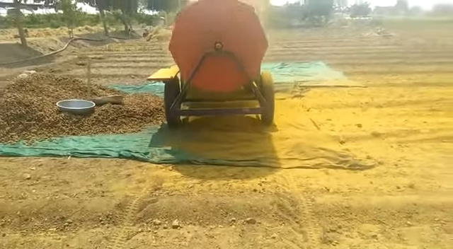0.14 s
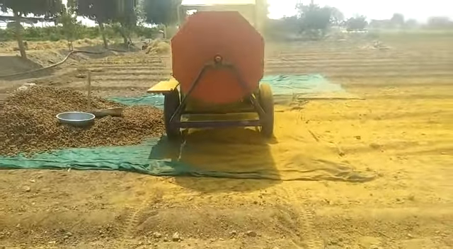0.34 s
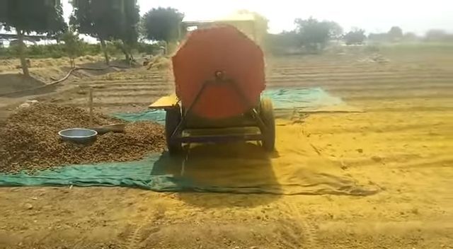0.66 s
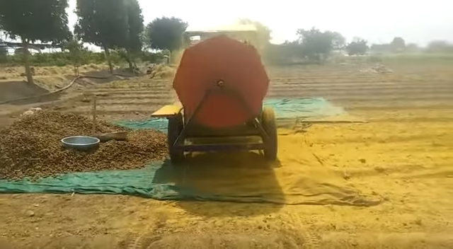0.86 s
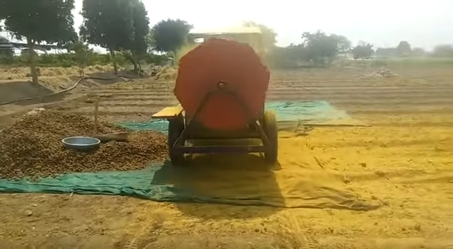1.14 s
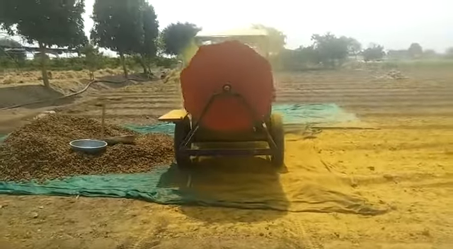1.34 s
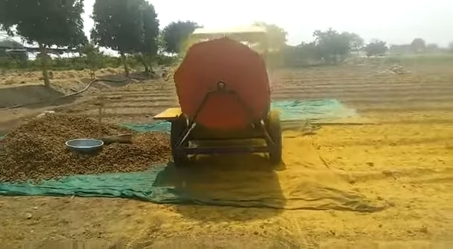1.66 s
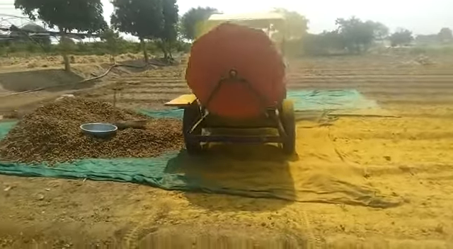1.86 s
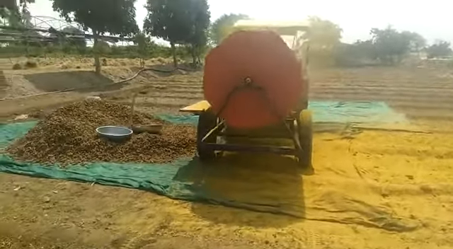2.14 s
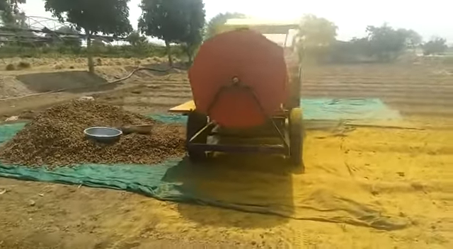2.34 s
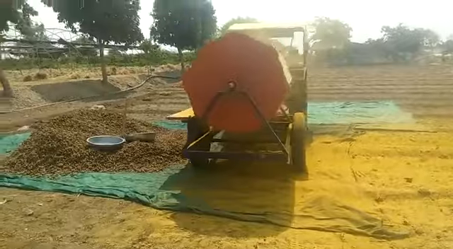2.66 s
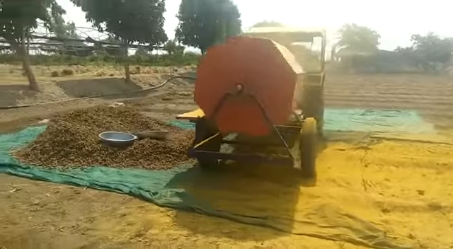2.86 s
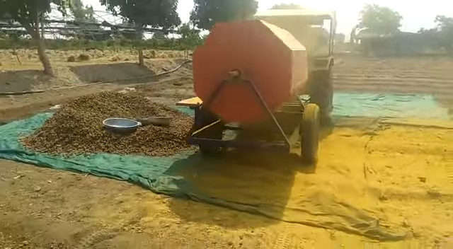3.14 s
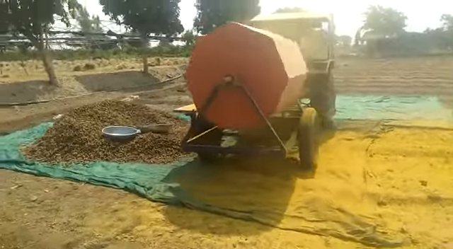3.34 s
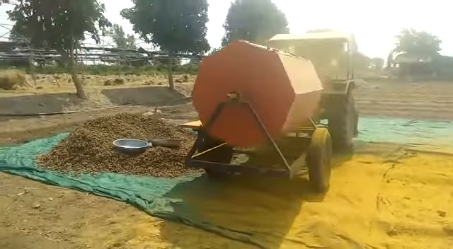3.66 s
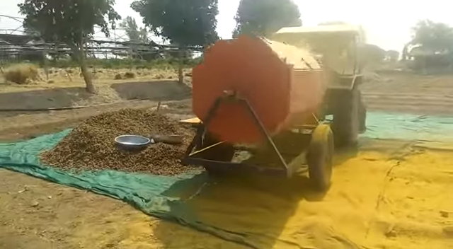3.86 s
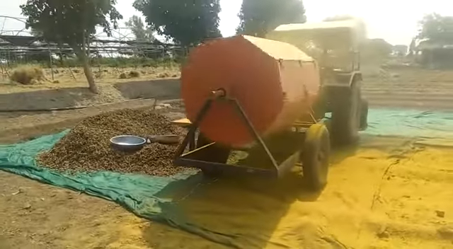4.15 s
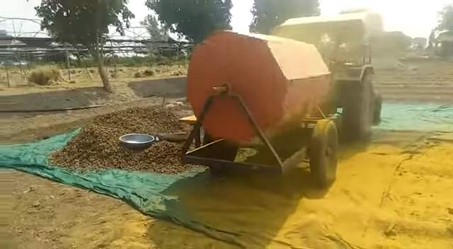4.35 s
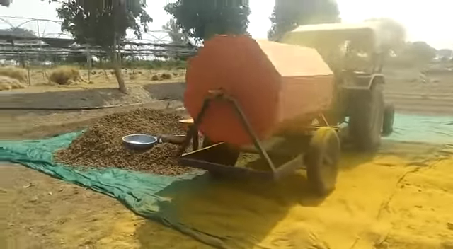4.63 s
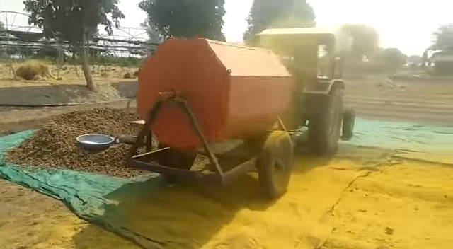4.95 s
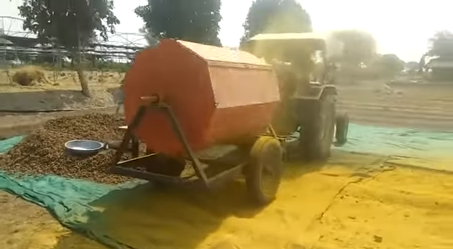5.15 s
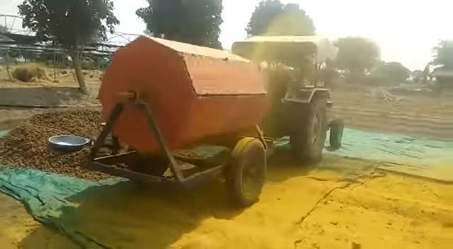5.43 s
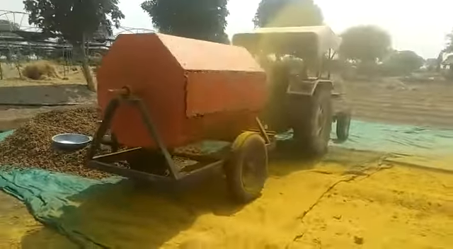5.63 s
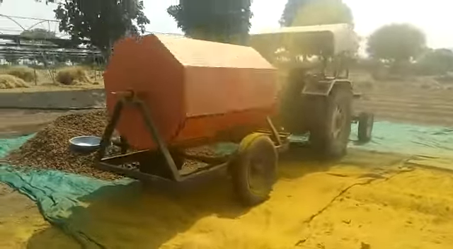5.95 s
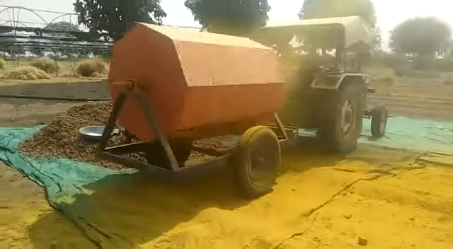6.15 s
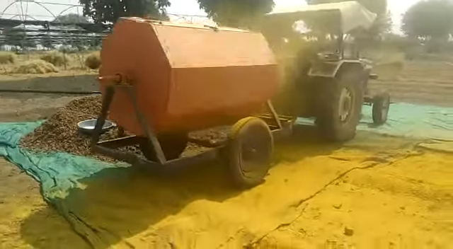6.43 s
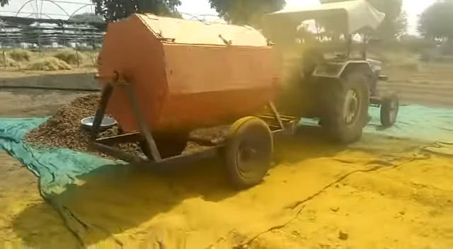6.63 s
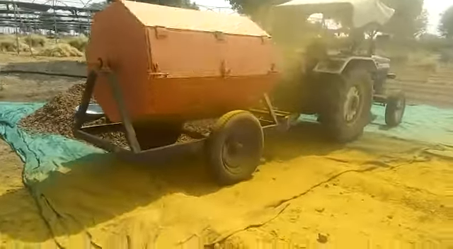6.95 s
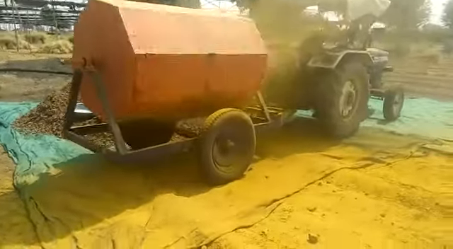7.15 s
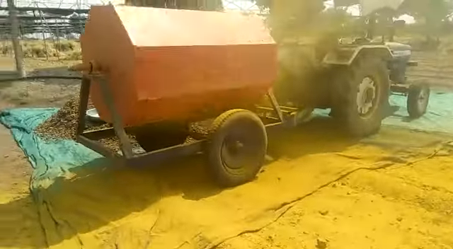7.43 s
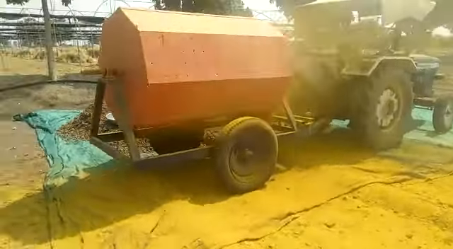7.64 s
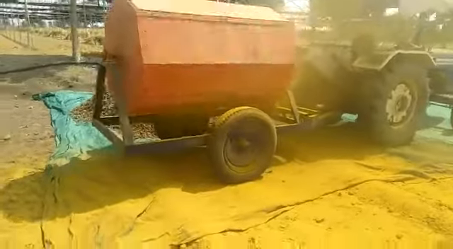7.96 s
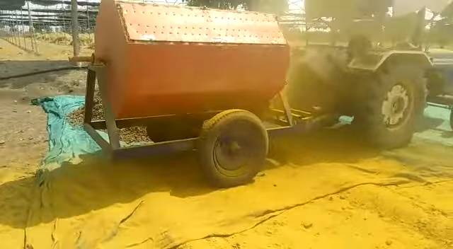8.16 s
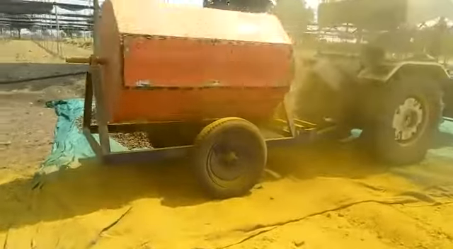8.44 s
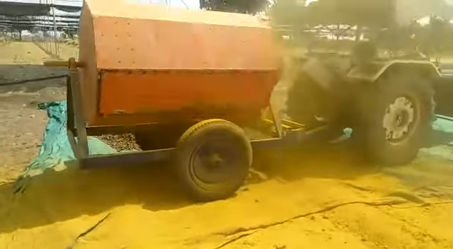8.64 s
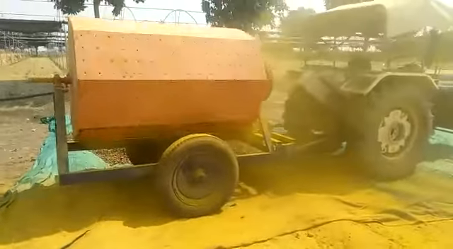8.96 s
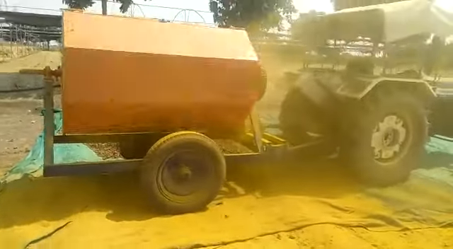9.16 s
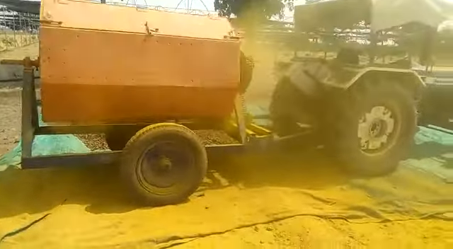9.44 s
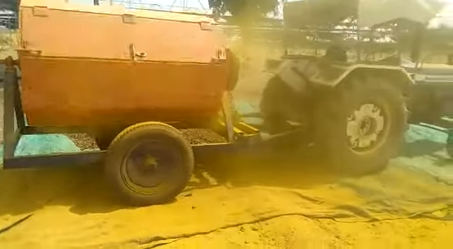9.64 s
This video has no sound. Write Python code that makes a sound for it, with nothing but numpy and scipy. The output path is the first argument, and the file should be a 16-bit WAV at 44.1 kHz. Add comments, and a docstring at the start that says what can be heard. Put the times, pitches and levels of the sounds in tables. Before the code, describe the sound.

Dried roots rattle and crash in rhythmic surges inside a turning steel drum, over a low tractor diesel hum and soft hollow booms.

```python
"""Dried roots rattle, slide and crash in surges inside an eight-sided steel polishing drum in a field.
A tractor turns it once in 1.4 s: its three-cylinder diesel hums underneath, and the drum booms softly.
Once a turn the hatch latch clinks. Noise clumps and ringing modes are coloured by the drum's response.
A hand is cupped near the microphone at first; then the listener walks from the drum's closed end
to its side, where the perforated plates sweep the hiss downwards as they pass."""
import sys
import numpy as np
from scipy import signal
from scipy.fft import rfft, irfft, next_fast_len
from scipy.io import wavfile
from scipy.ndimage import map_coordinates

SR = 44100
rng = np.random.default_rng(int(sys.argv[2]) if len(sys.argv) > 2 else 0)


def digitize_waveform(pressure):
    """Quantize a signal to 16-bit integers and store it at the path in sys.argv[1].

    Rows of a 2-D input are taken as channels; values are limited to [-1, 1].
    """
    field = np.atleast_2d(pressure).T
    bounded = np.clip(field, -1, 1)
    quanta = np.round(bounded * 32767).astype(np.int16)
    wavfile.write(sys.argv[1], SR, quanta)


N = 431738
TURN_S = 1.416  # one turn of the drum
# After the big crash the heaped load covers the holes: time within the turn and half-width.
COVER_AT_S, COVER_WIDTH_S = 0.59, 0.11

# The drum's colour heard from its corner. Each row: frequency in Hz, relative level in dB.
CORNER_VIEW = [(150, -38), (250, -13), (316, -13), (368, -29), (421, -8.5), (516, -14.5), (580, -7.5),
               (735, -3.5), (978, -9.5), (1300, -5.5), (3130, -9), (4930, -0.5), (7140, -5.5),
               (10500, -24.5), (14000, -33.5)]
# Perforated plates turning past. Each row: time in seconds, relative strength of the sweep in dB.
PLATES_PASSING = [(6.35, 4.5), (6.72, 2.5), (7.11, 6), (7.47, 3.5), (7.87, 5), (8.23, 5.5), (8.60, 7),
                  (8.93, 3.5), (9.32, 6), (9.68, 7)]
# A hard clump hangs for an instant, then strikes the steel.
# Each row: time in seconds, relative level in dB, t60 in seconds, hush before it in dB (below 0: a swell).
HARD_STRIKES = [(1.938, 0.5, 0.18, 1), (3.3263, -2, .12, 3), (3.5598, -6, 0.071, -0.5),
                (4.569, -11.5, 0.074, -1.5), (4.9092, 2, 0.22, 5.5), (5.4455, 4.5, .12, 1),
                (5.6441, -0.5, .1, 5), (6.1794, -3, 0.11, 1.5), (7.071, -5, 0.081, 0), (7.4739, -7, .1, 3),
                (7.871, 0, 0.081, 1)]


def roots(knock_db=-12, low_lag=0.41, low_db=-3.0):
    """Clumps of roots fall from plate to plate: knocks on the shell, bright clicks and a fizz of grit."""
    # Stereo width. Each row: frequency in Hz, side to mid in dB.
    stereo_width = [(3600, -80), (4000, -54), (4400, -78), (5200, -21), (6300, -9.5), (8000, -6.5),
                    (13000, -4.5)]
    frame = 1024  # samples
    sample_t = np.arange(N) / SR
    steps = np.arange(0, N / SR, .005)
    flow_db = np.interp(sample_t, steps, levels(steps)[1])
    clumps = unit(amp(1.0 * wobble(32) + 0.89 * wobble(140)))
    mid = clumps * cascade(flow_db)
    side = clumps * cascade(flow_db)
    # in the middle register the ring of the plates takes over from the dry clicks
    dry_click_db = [(450, 0), (700, -2.5), (2200, -1), (3600, 0)]
    mid = filtered(mid, lambda f: amp(along(dry_click_db, f)))
    mid = mid + amp(knock_db) * rings(rate=340, centre_hz=1750.0, spread=.45, t60=0.089, size_db=1.5)
    hush = amp(-hush_db(sample_t))
    hz, t, z = signal.stft(hush * [mid, side], SR, nperseg=frame)
    hz = hz[:, None]

    # each clump lands on another spot, and the echoes inside shift as the drum turns
    shifting_db = 2 * patches(hz, t, width_hz=330, rate=20) + 1.4 * patches(hz, t, width_hz=150, rate=3)
    shift_share = along([(600, 0.89), (1200, 0.55), (2500, 0.92), (5000, 1.0), (12000, 1.0)], hz)
    colour = amp(drum_colour(hz, t) + shifting_db * shift_share)

    # knock, click and grit each fill their own register and merge at the edges
    registers_hz = [(500, 3200), (3800, 7600), (8500, 14000)]
    upper = along([(2800, 0.0038), (4200, 0.98)], hz)
    top = along([(7000, 0), (9200, 0.88)], hz)
    shares = [1 - upper, upper - top, top]
    register_levels = levels(t)
    gain_db = 0
    for level_db, (low, high), share in zip(register_levels, registers_hz, shares):
        power = np.mean(colour ** 2 * (hz > low) * (hz < high), axis=0)
        gain_db = gain_db + share * (level_db - 10 * np.log10(power))
    # the lowest knocks come from the rolling bulk, which surges less than the falling roots
    bulk_share = along([(450, 0.56), (900, 0)], hz)
    gain_db = gain_db + bulk_share * (low_db - low_lag * (register_levels[0] + 28.0))

    mid_side_gain = np.array([np.ones_like(hz), amp(along(stereo_width, hz))])
    z = z * colour * amp(gain_db) * mid_side_gain
    mid, side = signal.istft(z, SR, nperseg=frame)[1][:, :N]
    return np.array([mid + side, mid - side])


def levels(t):
    """Knock, click and grit in dB: the surges of each turn over steady sliding, as they reach the walker."""
    # The load gives way five times a turn, always in this order: a pour that thins out into the lull,
    # a sudden spill that trickles on, the big crash, a long slide, a second crash.
    # Each row: rise in seconds, swell over the hold in dB, decay in seconds, then relative levels in dB
    # of the knock on the shell, the click of root on root and the grit.
    falls = [(.117, -5, .051, -24, -21, -39.5), (.008, -8, 1.6, -37.5, -30, -53),
             (.032, 0.75, .049, -21.5, -17.5, -37), (.086, 0, .057, -27.5, -23.5, -42.5),
             (.071, 0.58, .042, -23.5, -20.5, -40)]
    # Surges of the load, running through the five falls. Each row: start of the hold in seconds,
    # hold in seconds, strength in dB, extra click and grit in dB.
    surges = [(0.082, 0.099, -2.5, -2.5), (0.384, 0.025, -2.0, 1.0), (0.513, 0.019, -2.5, -1.0),
              (0.718, 0.25, -3.0, -0.5), (1.198, 0.052, -1.0, -1.0), (1.46, 0.126, -1.5, 0.0),
              (1.82, 0.076, 4.5, 0.0), (1.934, 0.012, 2.5, -0.5), (2.154, 0.22, -1.0, 0.5),
              (2.624, 0.037, 1.5, 0.0), (2.897, 0.13, 1.0, 1.0), (3.208, 0.04, 3.5, 0.5),
              (3.343, 0.027, 1.5, -0.5), (3.554, 0.25, 1.0, 0.0), (4.04, 0.03, 1.0, 0.5),
              (4.282, 0.14, 0.5, 1.5), (4.64, 0.034, -2.5, -1.5), (4.753, 0.049, 0.0, -1.0),
              (4.991, 0.23, 1.0, 1.5), (5.45, 0.054, 0.0, 2.0), (5.722, 0.12, 1.0, -0.5),
              (6.094, 0.048, -1.5, -1.0), (6.174, 0.033, -1.0, 1.5), (6.381, 0.245, 0.5, 0.5),
              (6.889, 0.045, 1.0, -1.5), (7.141, 0.14, 0.5, 0.5), (7.475, 0.076, 1.0, 1.0),
              (7.588, 0.044, 0.0, 1.0), (7.84, 0.21, 3.5, -1.5), (8.301, 0.032, 2.5, 0.0),
              (8.543, 0.15, 1.0, 0.0), (8.885, 0.03, -2, -1), (9.028, 0.023, -1.0, 0.5),
              (9.17, 0.24, -2.0, -0.5), (9.709, 0.047, -5.0, 0.0)]
    # Steady sliding between the surges: relative levels of knock, click and grit in dB.
    slide_db = [-39.5, -32.5, -42.5]
    # Once a turn the load rides on the wall and the sliding drops: knock, click and grit in dB.
    lull_db = [1, 14.5, 19]
    # Level along the walk. Each row: time in seconds, knock, click and grit in dB.
    carry = [(0.0, 3.1, -1.68, 3), (0.7, 4.9, -1.35, -3), (1.4, -1.1, -2.0, 1.3), (2.3, -3, -3.5, -6),
             (3.0, -4.5, -2.5, -4.5), (4.1, -1.7, 3, -1.5), (5.2, -0.5, -1.82, 0), (6.2, 0.6, 2.5, 4.2),
             (7.2, -1.5, 1.2, 3), (8.4, 0.4, 1.1, 1), (9.79, 5.5, 6.0, 2.5)]
    # A passing plate lets the grit through: knock, click and grit, in dB per dB of its sweep.
    spray = [0, -.43, 1.5]

    lull = each_turn(t, at_s=.255, width_s=.13)
    power = amp(np.c_[slide_db] - np.c_[lull_db] * lull) ** 2
    for k, (s, hold, strength_db, bright_db) in enumerate(surges):
        rise, swell, decay, knock_db, click_db, grit_db = falls[k % len(falls)]
        shape_db = strength_db + swell_db(t, s, rise, hold, decay) + swell * np.clip((t - s) / hold, 0, 1)
        fall_db = np.c_[[knock_db, click_db + bright_db, grit_db + bright_db]]
        power = power + amp(fall_db + shape_db) ** 2
    # the spray trails each plate by 0.06 s
    facing_db = sum(depth_db * bell(t, s + .06, .09) for s, depth_db in PLATES_PASSING)
    knock, click, grit = 10 * np.log10(power) + curves(carry, t) + np.c_[spray] * facing_db
    # grit sifts out as each long slide ends, and the heaped load muffles it after the big crash
    grit = grit + 1.5 * each_turn(t, at_s=1.09, width_s=0.099)
    grit = grit - 4.5 * each_turn(t, COVER_AT_S, COVER_WIDTH_S)
    return knock, click, grit


def cascade(flow_db, contacts=2400, rub_db=-6):
    """More flow means more contacts a second, over the rub of sliding roots."""
    rate = contacts * amp(.5 * (flow_db + 24))
    clicks = collisions(rate, size_db=4.5, click_t60=.004, drum_t60=.045, drum_db=-2)
    return unit(clicks + amp(rub_db) * rng.standard_normal(N))


def collisions(rate, size_db, click_t60, drum_t60, drum_db, count=24):
    """Random contacts of count kinds of root, each a dry click with a short ring inside the drum."""
    out = np.zeros(N)
    when = np.flatnonzero(rng.random(N) < rate / SR)
    size = amp(size_db * np.clip(rng.standard_normal(len(when)), -2, 2))
    size = size / np.sqrt(rate[when])  # density alone leaves the power even
    kind = rng.integers(count, size=len(when))
    for k in range(count):
        signed = size * rng.choice([-1, 1], len(when))
        hits = np.bincount(when[kind == k], signed[kind == k], N)
        sound = burst(click_t60) + amp(drum_db) * burst(drum_t60)
        out += signal.oaconvolve(hits, sound)[:N]
    return unit(out)


def rings(rate, centre_hz, spread, t60, size_db):
    """Each blow on a plate wakes one of its many modes, which rings briefly; the centre pitch may move."""
    t = np.arange(int(t60 * SR)) / SR
    when = np.flatnonzero(rng.random(N) < rate / SR)
    pitch, size = np.clip(rng.standard_normal((len(when), 2)), -1.8, 1.8).T[:, :, None]
    hz = np.broadcast_to(centre_hz, N)[when, None] * np.exp(spread * pitch)
    tones = amp(size_db * size - 60 * t / t60) * np.sin(2 * np.pi * hz * t)
    samples = when[:, None] + np.arange(len(t))
    return unit(np.bincount(samples.ravel(), tones.ravel(), N)[:N])


def drum_colour(hz, t):
    """The drum's response in relative dB towards the microphone, cupped at first, then walking."""
    # The rattle's colour under the cupped hand, at the closed end and at the side.
    # Each row: frequency in Hz, relative level in dB.
    cupped_view = [(150, -47), (250, -11), (368, -17.5), (525, -21.5), (760, -2), (1240, -13), (1570, 2),
                   (1950, -6.5), (2390, -5), (3640, -16.5), (4760, -5), (6240, -11.5), (8030, -19),
                   (8880, -32.5), (14000, -39)]
    end_view = [(150, -49), (250, -7), (375, -56), (436, -2), (525, -15), (735, -1), (869, -4.5),
                (1080, -17), (1260, -8.5), (2020, -7), (2730, -3.5), (3640, -13), (5010, -1), (6670, -5.5),
                (14000, -36)]
    broadside_view = [(150, -52), (250, -22.5), (306, -12), (368, -22), (421, -10), (516, -18), (600, -11),
                      (884, -10.5), (1060, -12), (1200, -10), (3520, -10.5), (4850, 0.5), (5830, -5.5),
                      (8450, -5.5), (14000, -21)]
    # The walk. Each row: time in seconds, place from 0 (cupped) over 1 (closed end) to 3 (broadside).
    walk = [(0, 0), (1.93, .15), (2.05, 1), (3.05, 1.1), (3.5, 1.9), (5.4, 2.1), (6.6, 2.9), (9.79, 3)]
    # A bright rim on the hiss sinks at first, then climbs from 3.6 s on.
    # Each row: time in seconds, frequency in Hz, strength in dB.
    rim = [(0, 8350, 2.5), (1.2, 8100, -0.5), (1.5, 6960, 1.5), (1.85, 6960, 15), (1.94, 6700, 0.5),
           (3.6, 6660, 3), (4.4, 7260, 4.5), (5.2, 7630, 8.5), (5.8, 7890, 5.5), (6.6, 7960, -1)]
    # The sound turns briefly hollow.
    # Each row: time in seconds, half-width in seconds, frequency in Hz, depth in dB.
    hollow = [(1.78, 0.19, 2650, 21), (1.68, 0.3, 5540, 20)]
    # Ridges of the shell's response. Each row: frequency in Hz, half-width in Hz, height in dB.
    shell = [(591, 31.5, 8), (715, 35, 6), (882, 31, 6.5), (1080, 200, 2), (4730, 340, 2.5)]
    # Narrow bands of the rattle swell and fade.
    # Each row: time in seconds, half-width in seconds, frequency in Hz, height in dB.
    swelling_bands = [(1.93, .2, 1300, 5.5), (2.4, .3, 2780, 3), (3.35, .15, 1390, 4.5),
                      (4.06, 0.11, 2159, 6), (4.78, .1, 1900, 4), (5.3, .35, 2360, 5), (6.5, .18, 1000, 7)]

    place, = curves(walk, t)
    place = np.clip(place, 0, 3)
    db = 0
    for k, view in enumerate([cupped_view, end_view, CORNER_VIEW, broadside_view]):
        db = db + along(view, hz) * np.clip(1 - abs(place - k), 0, 1)
    db = db + sum(ridge_db * bell(hz, centre, width) for centre, width, ridge_db in shell)
    rim_hz, rim_db = curves(rim, t)
    db = db + rim_db * (bell(hz, rim_hz, 690) - 0.5 * bell(hz, rim_hz + 950, 700))
    for s, length, centre, depth_db in hollow:
        db = db - depth_db * bell(t, s, length) * bell(hz, centre, 340)
    # the load over the holes muffles the top by 6 dB
    db = db - 6 * each_turn(t, COVER_AT_S, COVER_WIDTH_S) * along([(5900, 0), (7200, 1)], hz)
    # the steel's bright band hardly changes with the level of the clicks
    db = db + 0.02 * (levels(t)[1] + 29) * bell(hz, 4740, 520)
    for s, length, centre, swell_height_db in swelling_bands:
        db = db + swell_height_db * bell(t, s, length) * bell(hz, centre, 150)
    return db + plate_sweeps(hz, t)


def plate_sweeps(hz, t, lag=9.1e-5, lag_rate=0.00022):
    """Sound from neighbouring rows of holes interferes; as a plate turns away the lag grows, the peak falls."""
    db = 0
    for s, depth_db in PLATES_PASSING:
        cycles = hz * (lag + lag_rate * (t - s))  # lag in seconds, growing by lag_rate a second
        peak_and_dip = 1.6 * bell(cycles, 1, .1) - .7 * bell(cycles, .66, .2)
        db = db + depth_db * bell(t, s + .05, .22) * peak_and_dip
    return db * np.clip((hz - 4800) / 1500, 0, 1)


def patches(hz, t, width_hz, rate):
    """A smooth random field over frequency and time."""
    at = np.broadcast_arrays(hz / width_hz, t * rate)
    knots = rng.standard_normal((int(at[0].max()) + 3, int(at[1].max()) + 3))
    return map_coordinates(knots, at)


def hush_db(t, hang_s=.035):
    """The rattle's drop in level while a clump hangs, ending at the strike."""
    return sum(depth_db * bell(t, s, hang_s) * (t < s) for s, _, _, depth_db in HARD_STRIKES)


def strikes(strike_db=16):
    """A hard clump hits bare steel: a sudden crack in the drum's colour from its corner."""
    out = np.zeros(N)
    for s, peak_db, t60, _ in HARD_STRIKES:
        add(out, s, amp(peak_db + strike_db) * burst(t60))
    return filtered(out, lambda hz: amp(along(CORNER_VIEW, hz)))


def boom(boom_db=-1.0, rumble_db=-52, follow=0.43, rest_db=-54, heave_db=3.5, heave_at_s=1.23):
    """The load heaves once a turn; heavy lumps set the wide steel plates booming over a steadier rumble."""
    # The shell flexes under a heavy lump.
    # Each row: time in seconds, relative level in dB, centre pitch in Hz (gliding from row to row).
    thumps = [(.02, -40.5, 128), (.2, -43, 160), (1.02, -40.5, 119), (1.42, -41, 116), (1.63, -40, 127),
              (2.02, -47, 127), (2.28, -49, 175), (2.39, -41, 130.9), (2.75, -42, 126.1), (2.87, -41, 136),
              (3.0, -46, 148.2), (3.71, -58, 175), (4.25, -42, 121.4), (4.45, -46, 129.1), (5.48, -46, 156),
              (5.69, -35.5, 143), (6.54, -52, 147.9), (6.9, -43.5, 139), (7.16, -42, 127),
              (7.6, -38.5, 118.9), (7.9, -46, 130.3), (8.3, -52, 140), (8.51, -45.5, 146),
              (8.64, -45, 179.5), (9.44, -38.5, 142), (9.78, -47, 147.9)]
    # Colour of the rumble. Each row: frequency in Hz, relative level in dB.
    rumble_colour = [(20, -22), (38, -22), (50, 0), (80, -0.5), (105, 1.5), (125, 7), (165, -13),
                     (205, -3.5), (240, -4.5), (305, -2), (430, -11.5), (700, -22)]
    t, sample_t = np.arange(0, N / SR, .005), np.arange(N) / SR
    power = amp(rest_db + heave_db * np.cos(2 * np.pi * (t - heave_at_s) / TURN_S)) ** 2
    for s, db, _ in thumps:
        power = power + amp(db + swell_db(t, s, rise=0.078, hold=0, decay=0.067)) ** 2
    level_db = np.interp(sample_t, t, 10 * np.log10(power))
    pitch_hz = curves(thumps, sample_t)[1]
    thuds = rings(rate=70, centre_hz=pitch_hz, spread=0.252, t60=0.2, size_db=2.5)
    rumble = unit(filtered(rng.standard_normal(N), lambda hz: amp(along(rumble_colour, hz))))
    return amp(level_db + boom_db) * thuds + amp(rumble_db + follow * (level_db + 50.0)) * rumble


def latch(ring_db=-5, tick_db=1):
    """The loose steel latch falls against the hatch and rings in a few slightly varying modes."""
    # The latch drops. Each row: time in seconds, relative level in dB.
    drops = [(.41, -31), (1.819, -13.5), (3.205, -19), (4.634, -29), (6.06, -40), (7.472, -36),
             (8.89, -38.5)]
    # Its modes. Each row: mean frequency in Hz, mean relative level in dB, t60 in seconds.
    modes = [(1309.6, -12, 0.062), (2010, 4, 0.11), (3600, -9.5, 0.033), (5300, -10, 0.067),
             (6700, -15, 0.069)]
    out, t = np.zeros(N), np.arange(SR // 4) / SR
    for s, peak_db in drops:
        ring = 0
        for hz, db, t60 in modes:
            decay = amp(db + rng.normal(0, 1) - 60 * t / t60)
            ring = ring + decay * np.sin(2 * np.pi * hz * rng.normal(1, 0.0061) * t)
        add(out, s, amp(peak_db + ring_db) * ring * (1 - np.exp(-t / .002)))
        add(out, s, amp(peak_db + tick_db) * burst(.04))
    colour = [(400, -22), (900, -13), (6800, 5.0), (10000, -18)]  # (Hz, dB)
    return filtered(out, lambda hz: amp(along(colour, hz)))


def tractor(hum_db=-1, clatter_db=-47):
    """A three-cylinder diesel at nearly steady speed: exhaust hum and a puff of clatter at every firing."""
    # Each row: time in seconds, firing rate in Hz, relative level of the hum in dB.
    engine = [(0, 49, -60.5), (3.5, 49.46, -57.5), (9.79, 48.95, -57)]
    # Each row: multiple of the four-stroke cycle, relative level in dB.
    orders = [(2, -23), (3, 1.5), (4, -7), (5, -4), (6, -9), (9, -20), (12, -4.5)]
    firing_hz, level_db = curves(engine, np.arange(N) / SR)
    firings = np.cumsum(firing_hz) / SR
    cycle = 2 * np.pi * firings / 3  # three firings a cycle
    hum = 0
    for k, db in orders:
        hum = hum + amp(db + 0.75 * wobble(6.4)) * np.sin(round(k) * cycle + rng.uniform(0, 2 * np.pi))
    puffs = np.exp(-2.5 * (firings % 1)) * rng.standard_normal(N)
    colour = [(60, -18), (150, -9), (400, -19.0), (800, 6.0), (2000, -11.0), (6000, -3), (12000, -40)]
    clatter = filtered(puffs, lambda hz: amp(along(colour, hz)))
    return amp(level_db + hum_db) * np.sqrt(2) * hum + amp(clatter_db) * unit(clatter)


def amp(db):
    """Decibels to gain."""
    return 10 ** (np.asarray(db) / 20)


def unit(x):
    """Scale to rms 1."""
    return x / np.sqrt(np.mean(x ** 2) + 1e-20)


def along(points, hz):
    """Read (Hz, value) points on a log axis."""
    f, v = np.transpose(points)
    return np.interp(np.log(hz + 1), np.log(f + 1), v)


def curves(rows, t):
    """Each column after the time, read at times t."""
    s, *cols = np.transpose(rows)
    return [np.interp(t, s, c) for c in cols]


def bell(x, centre, width):
    """A smooth bump of height 1."""
    return np.exp(-((x - centre) / width) ** 2)


def each_turn(t, at_s, width_s):
    """A bump of height 1 that comes back with every turn of the drum."""
    return bell((t - at_s + TURN_S / 2) % TURN_S - TURN_S / 2, 0, width_s)


def swell_db(t, s, rise, hold, decay):
    """An envelope in dB: exponential rise up to time s, hold, exponential decay."""
    return -20 / np.log(10) * (np.maximum(s - t, 0) / rise + np.maximum(t - s - hold, 0) / decay)


def wobble(rate):
    """A smooth random curve, rate knots a second."""
    knots = rng.standard_normal(int(N * rate / SR) + 4)
    return map_coordinates(knots, [np.arange(N) * rate / SR])


def filtered(x, response):
    """x times a response of frequency."""
    size = next_fast_len(N + SR // 2)
    return irfft(rfft(x, size) * response(np.fft.rfftfreq(size, 1 / SR)), size)[..., :N]


def burst(t60):
    """A dying puff of noise with energy 1, at most an eighth of a second long."""
    t = np.arange(SR // 8) / SR
    puff = rng.standard_normal(len(t)) * amp(-60 * t / t60)
    return puff / np.linalg.norm(puff)


def add(track, s, sound):
    """Mix a sound into the track at time s."""
    part = track[max(round(s * SR), 0):][:len(sound)]
    part += sound[:len(part)]


def scene():
    """Drum and tractor in the open field."""
    return roots() + strikes() + boom() + latch() + tractor()


def record(dry, dip_hz=372, dip_width_hz=19, top_hz=14200):
    """The microphone rounds off the highest peaks, has a narrow dip in the low middle and a band limit."""
    mid = dry.mean(axis=0)
    excess = mid - mid / (1 + (mid / .65) ** 6) ** (1 / 6)
    return filtered(dry - excess, lambda hz: (1 - 0.8 * bell(hz, dip_hz, dip_width_hz)) * (hz < top_hz))


dry = scene()
out = record(dry)
digitize_waveform(out)
```